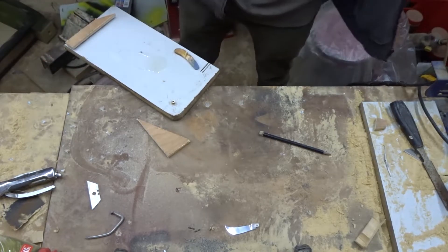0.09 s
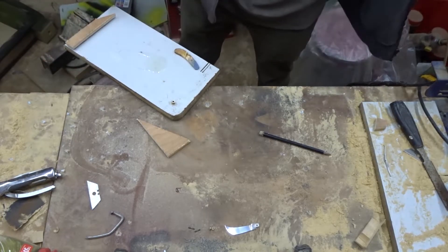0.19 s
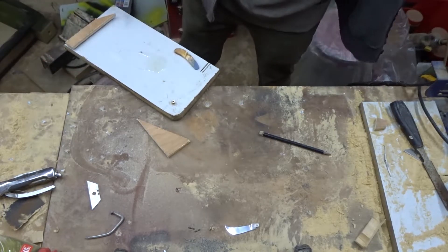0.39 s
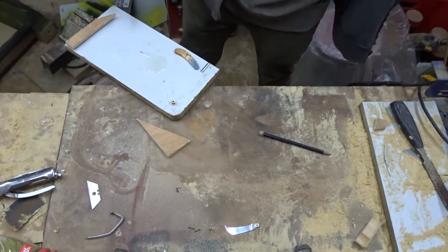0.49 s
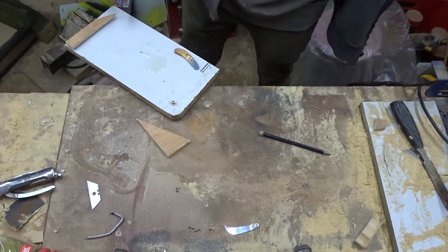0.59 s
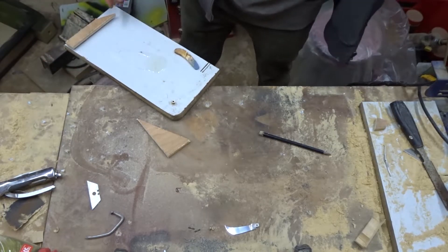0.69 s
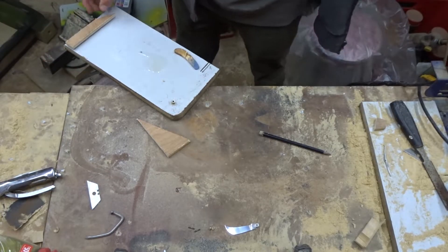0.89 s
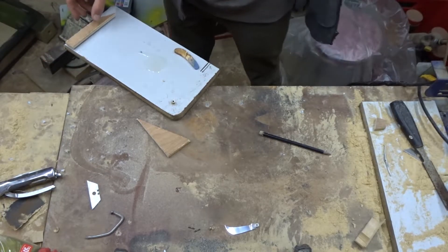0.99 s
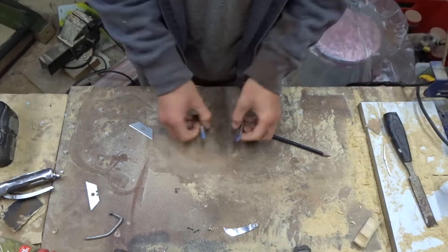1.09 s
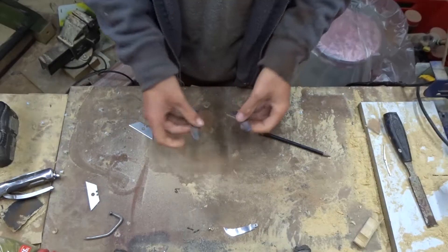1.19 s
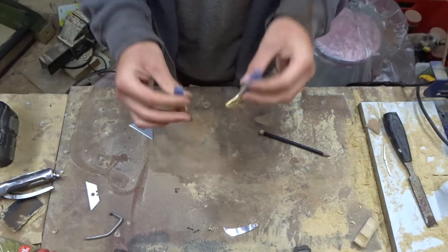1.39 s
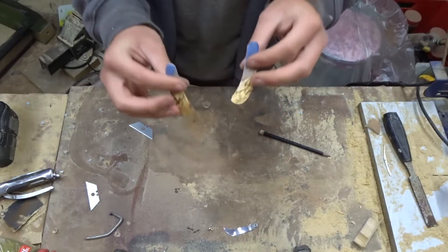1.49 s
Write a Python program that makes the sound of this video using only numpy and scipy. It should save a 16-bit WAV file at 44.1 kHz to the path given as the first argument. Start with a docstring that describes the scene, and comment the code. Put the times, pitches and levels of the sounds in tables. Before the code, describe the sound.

Workbench clatter: a board drops and skids squeaking, a wood piece knocks, a spring clamp clacks down

```python
"""In a quiet workshop, a board drops and skids with a squeal on a wooden bench, a piece of wood slides and
tumbles, and a spring clamp clacks down. The bench booms on and things on it keep rocking until a quick cut
to the hush. Impacts ring decaying modes; the squeal is a rough tone with overtones; the clatter, the slide,
the tumble and the crackle are coloured random clicks, and the hush is coloured noise.
A close pair of microphones keeps the bass in the middle and the treble wide."""
import sys
import numpy as np
from scipy import signal
from scipy.io import wavfile
from scipy.ndimage import uniform_filter1d

SR = 44100
rng = np.random.default_rng(int(sys.argv[2]) if len(sys.argv) > 2 else 0)


def master_out(mix):
    """Clip the mix to full scale and print it as 16-bit PCM to the path in sys.argv[1]."""
    frames = np.transpose(np.atleast_2d(mix))
    ceiling = np.clip(frames, -1, 1)
    pcm = np.round(ceiling * 32767).astype(np.int16)
    wavfile.write(sys.argv[1], SR, pcm)


def volts_from_decibels(level):
    """Turn decibel levels (scalar or array-like) into linear amplitude factors."""
    exponent = np.asarray(level, float) / 20
    return 10 ** exponent


N = 66150  # samples, 1.5 s
T = np.arange(N) / SR


def evened(x):
    """Scales a signal to an rms of one."""
    return x / np.sqrt(np.mean(x ** 2) + 1e-20)


def colour(x, points):
    """Minimum-phase filter whose gain follows the points (f/Hz, level/dB), so nothing sounds early."""
    f, db = np.transpose(points)
    hz = abs(np.fft.fftfreq(4096, 1 / SR))
    gain_db = np.interp(np.log(hz + 1), np.log(f + 1), db)
    log_gain = np.maximum(gain_db, -100) * np.log(10) / 20
    spectrum = np.exp(np.conj(signal.hilbert(log_gain)))
    impulse = np.fft.ifft(spectrum).real[:2048]
    return signal.oaconvolve(x, impulse)[:N]


def curve(rows, axis=1):
    """Gain over time from one dB column, silent outside the rows."""
    rows = np.transpose(rows)
    return volts_from_decibels(np.interp(T, rows[0], rows[axis], left=-200, right=-200))


def ring(x, modes):
    """Every click in x rings the modes, sines that die away exponentially."""
    t = T[:SR // 2]
    struck = sum(volts_from_decibels(db - 60 * t / t60) * np.sin(2 * np.pi * hz * t) for hz, db, t60 in modes)
    return signal.oaconvolve(x, struck)[:N]


def clicks(per_s, spread_db):
    """Random contacts of both signs, a few of them large."""
    chance = rng.random(N)
    size = np.minimum(rng.exponential(1, N), 4)
    sign = rng.choice([-1., 1.], N)
    return evened((chance < per_s / SR) * sign * volts_from_decibels(spread_db * size))


def blows(rows, axis=1):
    """One click per row, sized by one dB column."""
    x = np.zeros(N)
    for row in rows:
        x[round(row[0] * SR)] += volts_from_decibels(row[axis])
    return x


# spectrum shape of the hush: [f/Hz, level/dB per Hz]
HUSH_COLOUR = [(15, -2), (40, -3), (90, -2), (180, -3), (700, -9), (1400, -11), (2000, -12), (2800, -15.5),
               (5600, -20), (11000, -27), (14300, -65), (22000, -120)]
# side of the hush relative to its mid: [f/Hz, level/dB]
HUSH_WIDTH = [(60, -61), (140, -7), (340, -4.5), (820, 0.5), (1950, 1.5), (4660, 4), (11100, 4)]
HUSH_DB = -64.5  # rms of the mid


def air():
    """Workshop hush: two independent coloured noises, one for mid and one for side."""
    middle, other = (colour(noise, HUSH_COLOUR) for noise in rng.standard_normal((2, N)))
    return volts_from_decibels(HUSH_DB) / np.std(middle) * np.array([middle, colour(other, HUSH_WIDTH)])


# how fast the echoes die: [f/Hz, t60/s]
ROOM_DECAY = [(100, 0.39), (400, 0.34), (1200, 0.24), (3000, 0.22), (6000, 0.32), (11000, 0.21)]


def room(x):
    """Sparse echoes of random sign, each band dying at its own speed."""
    echoes = np.zeros(SR // 2)
    at = np.arange(120, SR // 2 - 20, 20)
    echoes[at + rng.integers(0, 20, len(at))] = rng.choice([-1., 1.], len(at))
    hz, t, bands = signal.stft(echoes, SR, nperseg=256)
    f, t60 = np.transpose(ROOM_DECAY)
    decay = volts_from_decibels(-60 * t / np.interp(hz, f, t60)[:, None])
    tail = signal.istft(bands * decay, SR, nperseg=256)[1]
    return signal.oaconvolve(x, tail / np.linalg.norm(tail))[:N]


# modes of the bench top: [f/Hz, level/dB, t60/s]
BENCH_MODES = [(50.3, -7, 0.28), (79.2, -11.5, 0.36), (104.4, -1.5, 0.16), (120.8, -8, 0.13),
               (202.7, -16, 0.17), (259, -4, 0.049), (304.4, -4, 0.2), (353, 2.5, 0.21), (406.4, 2.5, 0.07),
               (511, -5, 0.074), (568.2, -1.5, 0.15), (624, -8.5, 0.05), (710.4, -7, 0.13),
               (787, -7.5, 0.12), (933, -9, 0.078)]
# force of skidding, tumbling and rocking: [t/s, level/dB on the upper modes, level/dB on the boom]
BENCH_LOAD = [(0.203, -70, -70), (0.213, -34, -28.5), (0.267, -31.5, -32), (0.3, -28, -38),
              (0.327, -36, -33), (.41, -61, -39), (0.447, -52, -49), (.49, -47.5, -56), (0.53, -53.5, -52),
              (0.615, -59.5, -47), (0.648, -44, -60), (0.662, -31, -50), (.7, -48.5, -41), (0.74, -41, -51),
              (0.795, -70, -58), (0.813, -72, -47), (0.82, -40, -59), (.87, -45.5, -44), (.93, -52, -50.5),
              (1.017, -57, -64), (1.045, -47, -40), (1.087, -59.5, -56), (1.13, -72, -54)]
# blows on the bench: [t/s, level/dB on the upper modes, level/dB on the boom]
BENCH_THUDS = [(0.208, -34, -47), (0.25, -42, -35), (0.29, -38.5, -28.5), (.335, -36.5, -42),
               (.38, -48, -32), (.41, -50.5, -42), (.47, -55, -43), (.487, -53.5, -53), (.507, -64, -42),
               (.585, -62, -56), (0.66, -48, -37), (0.667, -37.5, -55), (0.679, -47, -51), (.703, -50, -41),
               (.738, -47, -36.5), (0.817, -37, -32.5), (0.838, -49, -33), (.888, -48, -32.5),
               (0.945, -64, -40.5), (.985, -59, -62), (1.032, -59.5, -45), (1.108, -62.5, -56)]
# length of a contact: [time/s as the upper modes feel it, time/s as the boom feels it]
CONTACT_LENGTH = [0.00076, 0.0039]
BUMPS_PER_S, BUMP_SPREAD_DB, BUMP_TRIM_DB = 900, 2.5, -3
BOOM_TOP_HZ = 230


def bench():
    """Blows and small bumps ring the bench top, driving boom and upper modes unequally; longer contacts dull it."""
    bumps, out = clicks(BUMPS_PER_S, BUMP_SPREAD_DB), np.zeros(N)
    for axis, low in enumerate((False, True), start=1):
        modes = [mode for mode in BENCH_MODES if (mode[0] < BOOM_TOP_HZ) == low]
        rumble = ring(bumps * curve(BENCH_LOAD, axis=axis), modes) / np.std(ring(bumps, modes))
        thuds = ring(blows(BENCH_THUDS, axis=axis), modes)
        soft = np.hanning(round(CONTACT_LENGTH[low] * SR) + 3)
        out += np.convolve(volts_from_decibels(BUMP_TRIM_DB) * rumble + thuds, soft / soft.sum())[:N]
    return out


# swell of the slide: [t/s, level/dB]
SLIDE_LEVEL = [(.54, -87), (.58, -63.5), (.62, -58), (.67, -57), (.72, -58.5), (.77, -98)]
# spectrum shape of the slide: [f/Hz, level/dB per Hz]
SLIDE_SPECTRUM = [(530, -37), (900, -6), (1380, -5), (1910, 1.5), (2330, -9), (2570, -3), (2850, -4.5),
                  (4150, -7.5), (11000, -23.5), (14300, -47), (22000, -120)]
# modes of the piece of wood: [f/Hz, level/dB, t60/s]
PIECE_MODES = [(253, 1.5, 0.092), (575, -2.5, 0.094), (654, -6, 0.15), (850, -19, 0.11), (1100, -13, 0.12),
               (1290, -6.5, 0.028), (1330, -6, 0.027), (1770, -3, 0.033), (2080, -5, 0.019),
               (2780, -15, 0.027)]
# taps that ring the piece: [t/s, level/dB]
PIECE_TAPS = [(.653, -49), (.6597, -37), (.6636, -37), (.6675, -39.5), (.6795, -50), (.71, -46),
              (.722, -52), (.731, -43.5), (.745, -53)]
# level of the tumbling contacts: [t/s, level/dB]
TUMBLE_LEVEL = [(0.645, -62), (0.661, -35), (0.701, -49.5), (.725, -45), (0.745, -53.5), (0.787, -83),
                (0.8, -80)]
# spectrum shape of the tumbling contacts: [f/Hz, level/dB per Hz]
TUMBLE_SPECTRUM = [(290, -30), (500, 1.5), (520, 1), (569, -4), (1090, -5.5), (1540, -7.5), (2180, -16.5),
                   (2330, -14), (2520, -11), (11000, -81), (14300, -80.5), (22000, -120)]


def wood():
    """Dense fine contacts make a soft slide; taps ring the piece among sparser, dull tumbling contacts."""
    slide = curve(SLIDE_LEVEL) * evened(colour(clicks(6000, 1.7), SLIDE_SPECTRUM))
    taps = ring(blows(PIECE_TAPS), PIECE_MODES)
    tumble = curve(TUMBLE_LEVEL) * evened(colour(clicks(2500, 2.2), TUMBLE_SPECTRUM))
    return slide + taps + tumble


# modes of the clamp: [f/Hz, level/dB, t60/s]
CLAMP_MODES = [(647, -8, .17), (675, -10.5, 0.14), (720, -4.5, 0.14), (845, -14, .1), (977, -12.5, 0.096),
               (1270, -23, .07), (1516, -18, 0.087), (1386, -3, 0.042), (2120, -15.5, 0.067),
               (2520, -7.5, 0.076), (2760, -2.5, 0.076), (2925, -8, 0.08), (3340, 0, 0.05),
               (3550, -3, 0.084), (3590, -10, .05), (3870, -20, 0.037), (4170, -20, 0.074),
               (5292, -20, 0.07), (5550, -43, 0.033), (7730, -26, 0.05)]
# contacts of the clamp, before a common trim: [t/s, level/dB]
CLAMP_CLACKS = [(.8145, -40), (.8175, -24), (.8205, -32), (.8235, -35.5), (.828, -18), (.8375, -34),
                (.849, -43), (.863, -42), (.872, -42), (.881, -48)]
# spectrum shape of the crackle: [f/Hz, level/dB per Hz]
CRACKLE_SPECTRUM = [(290, -28), (500, -5.5), (700, -1.5), (1070, -13.5), (1690, -7), (1850, -14),
                    (3390, -3), (4390, -17.5), (5400, -26.5), (11000, -61), (14300, -84), (22000, -120)]
CRACKLE_START_DB, CRACKLE_T60_S = -26, 0.12


def clamp():
    """Quick contacts ring the clamp over a crackle that dies away from the first contact."""
    after = T - CLAMP_CLACKS[0][0]
    decay = (after > 0) * volts_from_decibels(CRACKLE_START_DB - 60 * np.maximum(after, 0) / CRACKLE_T60_S)
    crackle = decay * evened(colour(clicks(5000, 2.7), CRACKLE_SPECTRUM))
    return ring(blows(CLAMP_CLACKS), CLAMP_MODES) * volts_from_decibels(-11) + crackle


# course of the skid: [t/s, squeal f/Hz, squeal level/dB, clatter level/dB]
SKID_COURSE = [(.2055, 1293, -55, -48), (.21, 1288, -20.5, -25.5), (.216, 1287, -30, -33),
               (.23, 1282, -28.5, -24.5), (.241, 1259, -33, -27), (.246, 1267, -53, -36),
               (.251, 1251, -22.5, -25), (.258, 1243, -45, -30.5), (.275, 1255, -44, -26),
               (.289, 1240, -60, -33), (.295, 1246, -20.5, -20.5), (.3, 1287, -38, -27),
               (.308, 1244, -51, -49), (.32, 1177, -65, -30), (.35, 1235, -67, -53), (.42, 1210, -81, -55)]
# overtones of the squeal: [multiple of the squeal frequency, relative level/dB]
SQUEAL_OVERTONES = [(1, 2.5), (2, 2.5), (3, -21), (4, -22), (5, -25)]
# spectrum shape of the clatter: [f/Hz, level/dB per Hz]
CLATTER_SPECTRUM = [(290, -37.5), (500, -7.5), (786, -7.5), (1110, -16), (1270, -10.5), (2130, -16.5),
                    (2450, -11.5), (3100, -18), (3760, -18.5), (4510, -28), (11000, -45.5), (14300, -64),
                    (22000, -120)]
# modes of the board: [f/Hz, level/dB, t60/s]
BOARD_MODES = [(431.6, -0.5, 0.08), (790.6, -5.5, .11), (1255, -1.5, 0.082), (1323, -2, 0.062),
               (1672, -5.5, .04), (1903, -7.5, 0.053), (2492, 2, .05), (2662, -6, 0.042),
               (3734, -11.5, 0.053), (4980, -19, 0.062)]
# knocks that ring the board: [t/s, level/dB]
BOARD_KNOCKS = [(.2075, -29.5), (.2105, -24), (.216, -34.5), (.223, -31), (.23, -25), (.237, -28.5),
                (.248, -28), (.251, -25.5), (.271, -33.5), (.293, -30.5), (.2955, -25.5), (.307, -31)]
SQUEAL_WOBBLE, SQUEAL_FLUTTER = 0.032, 0.34  # rms share of the pitch and of the level


def skid():
    """Uneven stick-slip gives a rough squeal with overtones, among dense clatter and knocks of the board."""
    t, hz = np.transpose(SKID_COURSE)[:2]
    wobble, flutter = (evened(uniform_filter1d(noise, 60)) for noise in rng.standard_normal((2, N)))
    turns = np.cumsum(np.interp(T, t, hz) * (1 + SQUEAL_WOBBLE * wobble)) / SR
    tone = evened(sum(volts_from_decibels(db) * np.cos(2 * np.pi * k * turns) for k, db in SQUEAL_OVERTONES))
    squeal = curve(SKID_COURSE, axis=2) * tone * (1 + SQUEAL_FLUTTER * flutter)
    clatter = curve(SKID_COURSE, axis=3) * evened(colour(clicks(6000, 1.85), CLATTER_SPECTRUM))
    return squeal + clatter + ring(blows(BOARD_KNOCKS), BOARD_MODES)


# gain of the echoes that fill the side: [f/Hz, level/dB]
ECHO_WIDTH = [(60, -31.5), (130, -38), (270, -31), (560, -19.5), (1190, -7.5), (2500, -6.5), (5270, 1),
              (11100, -2.5)]
# share of the mid taken from the side: [f/Hz, level/dB relative to mid]
SIDE_LEAN = [(100, -36), (500, -19), (1500, -12), (2800, -15), (4000, -6), (11000, -12)]
ROOM_DB = -5  # echoes in the mid


def spread(dry):
    """Makes mid and side: separate echoes widen the treble, and a share of the mid unbalances the pair."""
    mid = dry + volts_from_decibels(ROOM_DB) * room(dry)
    side = colour(room(dry), ECHO_WIDTH) - colour(mid, SIDE_LEAN)
    return np.array([mid, side])


BASS_CUT_HZ = 70
CUT_S, CUT_FADE_S = 1.135, 0.0023  # silent from CUT_S on, after this short fade


def scene():
    """Mixes the sources, cuts them off over the lasting hush and turns mid and side into left and right."""
    dry = bench() + wood() + clamp() + skid()
    # small things radiate little deep bass
    dry = signal.sosfilt(signal.butter(2, BASS_CUT_HZ, "high", fs=SR, output="sos"), dry)
    fade = np.clip((CUT_S - T) / CUT_FADE_S, 0, 1)
    mid, side = spread(dry) * fade + air()
    return np.array([mid + side, mid - side])


def band_limit(x):
    """A steep low-pass at the top of the band."""
    return signal.sosfilt(signal.butter(12, 11720, fs=SR, output="sos"), x)


def record(dry):
    """Band limit: a steep low-pass takes off the top of the treble."""
    lowpass = signal.firwin(511, 11130, window=("kaiser", 9), fs=SR)  # edge in Hz
    mix = signal.oaconvolve(dry, lowpass[None], "same")
    return band_limit(mix)


dry = scene()
out = record(dry)
master_out(out)
```